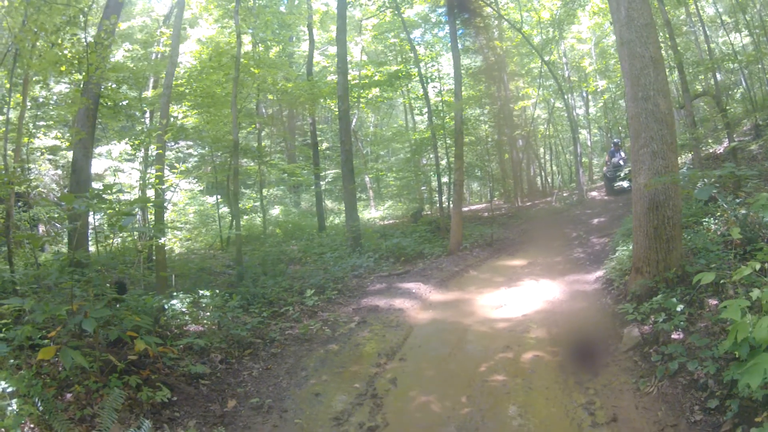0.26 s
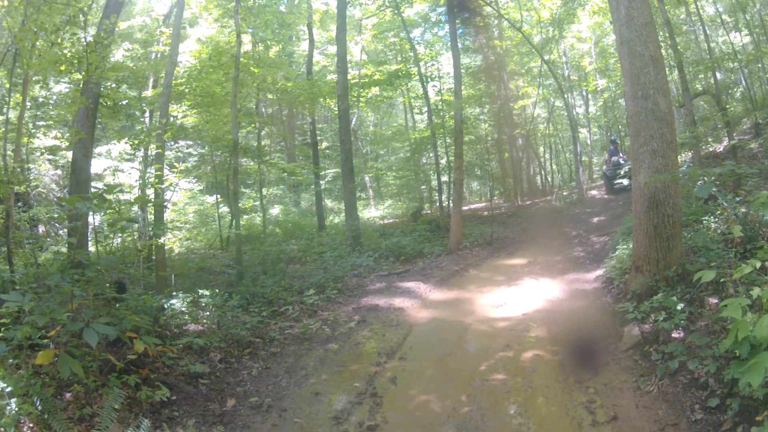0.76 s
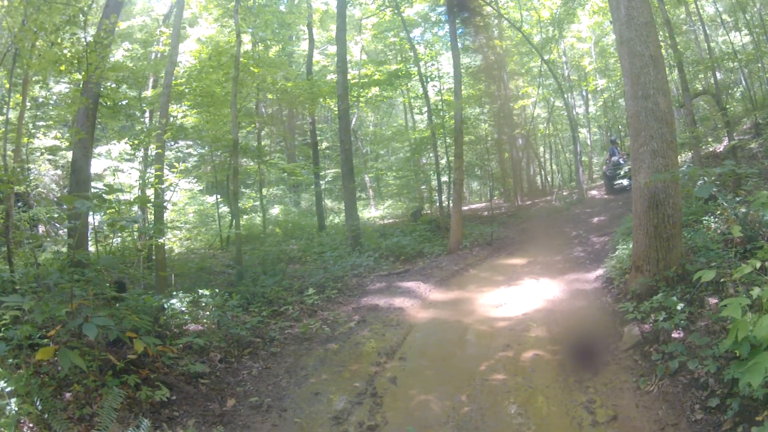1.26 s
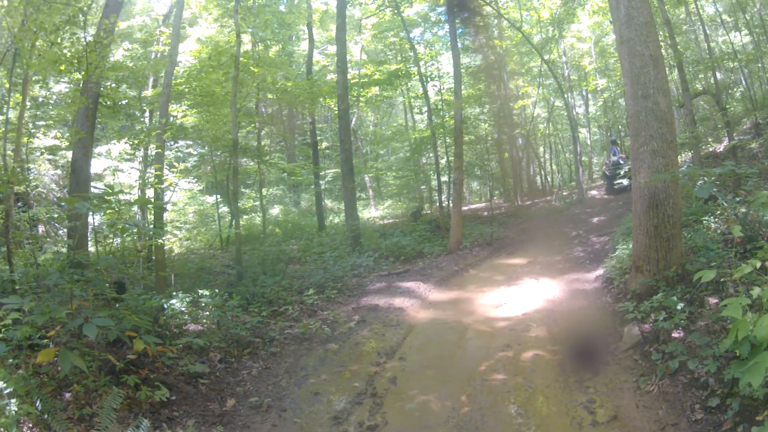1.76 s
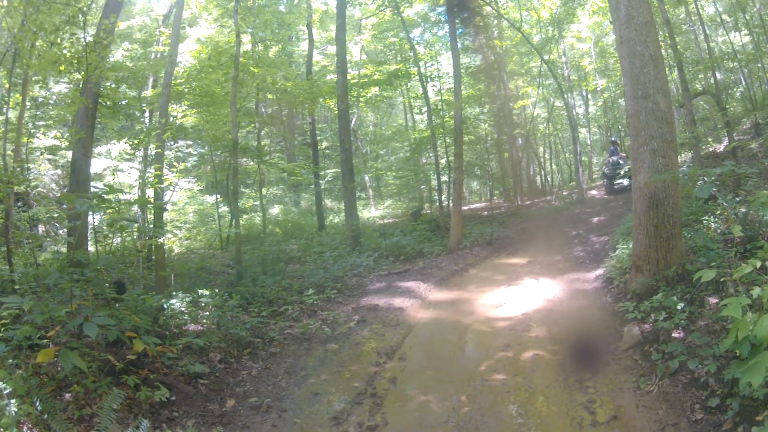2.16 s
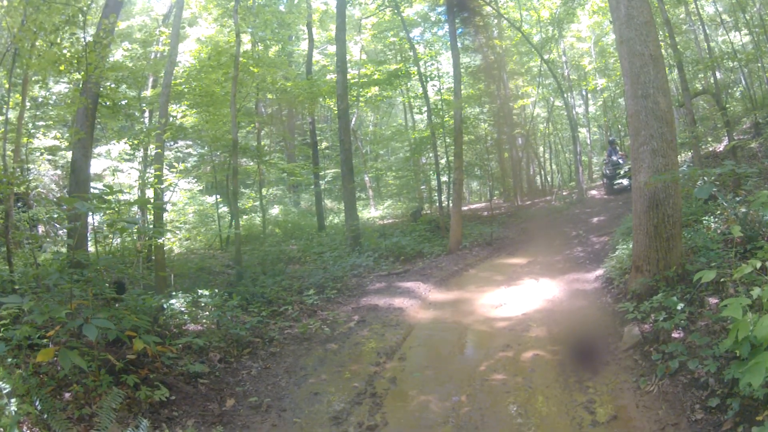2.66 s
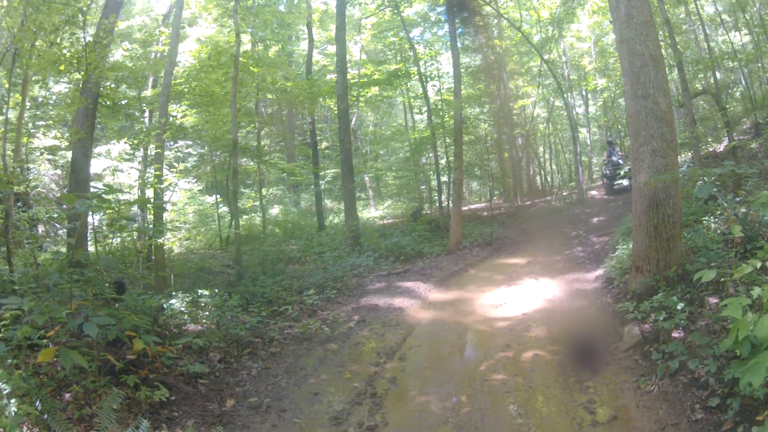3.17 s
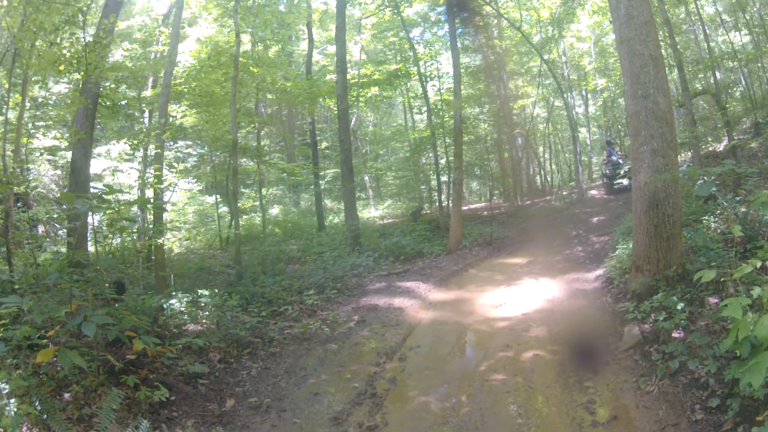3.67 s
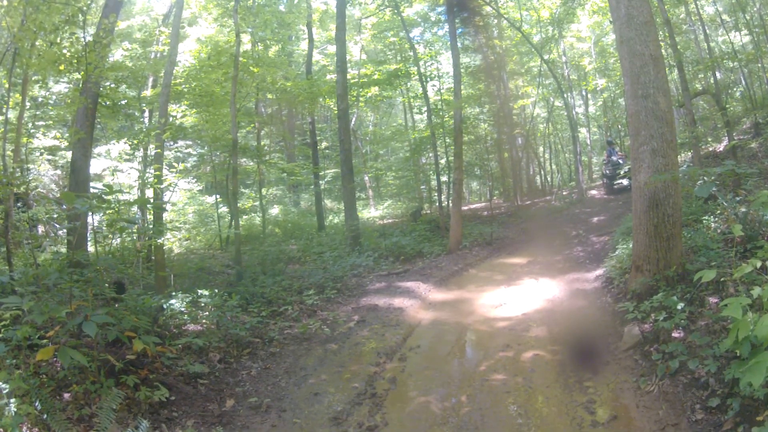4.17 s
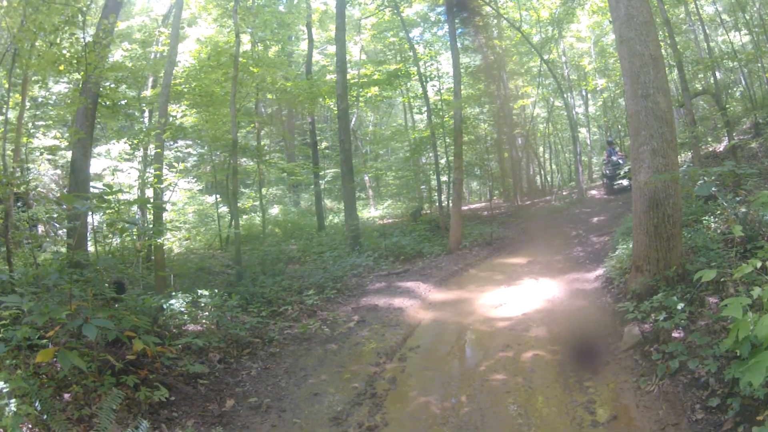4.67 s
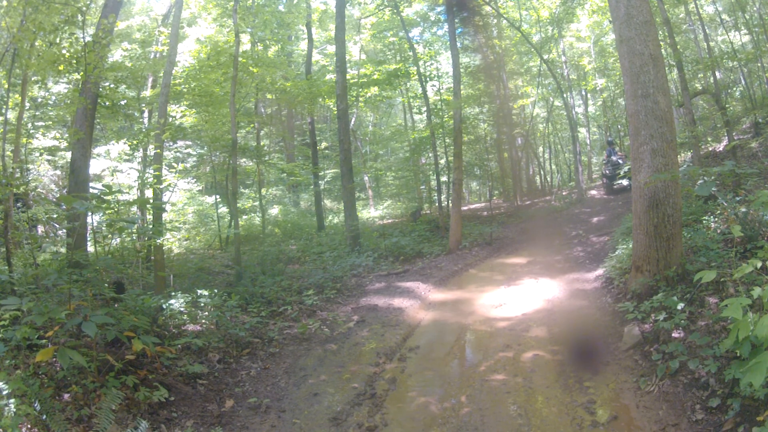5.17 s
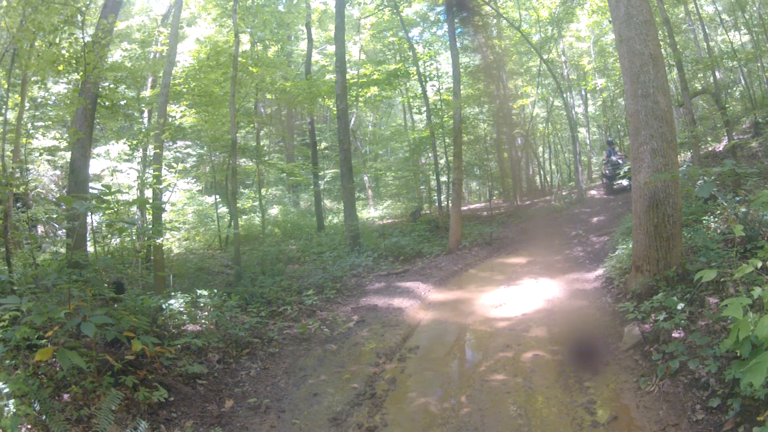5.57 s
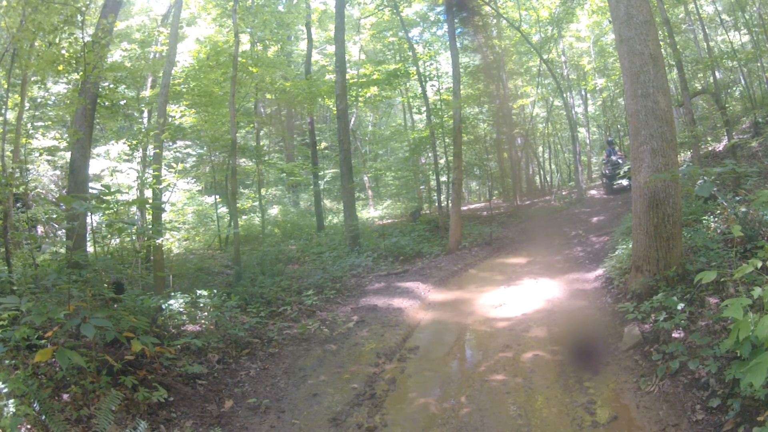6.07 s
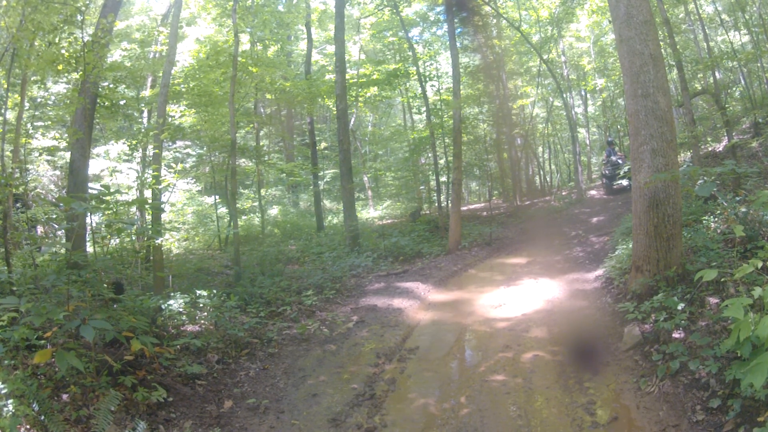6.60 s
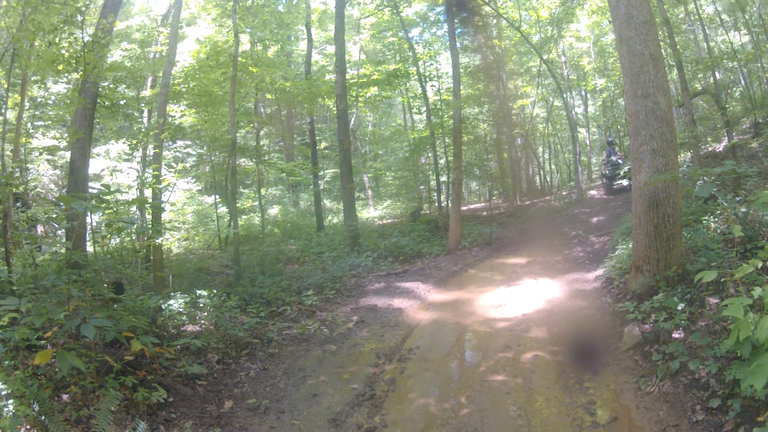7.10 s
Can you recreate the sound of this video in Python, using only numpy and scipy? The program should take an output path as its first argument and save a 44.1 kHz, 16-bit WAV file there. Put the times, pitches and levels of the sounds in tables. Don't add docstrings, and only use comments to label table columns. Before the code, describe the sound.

Close, gritty idle of a small four-stroke trail vehicle, steadily putting and clattering for six seconds before it jolts under load and speeds up.

```python
import sys
import numpy as np
from scipy import signal
from scipy.fft import rfft, irfft, next_fast_len
from scipy.io import wavfile
from scipy.ndimage import uniform_filter1d

SR = 44100
rng = np.random.default_rng(int(sys.argv[2]) if len(sys.argv) > 2 else 0)


def pcm_store(signal):
    levels = np.round(np.clip(np.atleast_2d(signal), -1, 1) * 32767)
    wavfile.write(sys.argv[1], SR, levels.astype(np.int16).T)


def volts_from_decibels(level):
    exponent = np.asarray(level, float) / 20
    return 10 ** exponent


N = 323694
TIME = np.arange(N) / SR
LOCK_S = 6.75


def level(x, db):
    return x * volts_from_decibels(db) / np.sqrt(np.mean(x ** 2))


def curves(table):
    s, *columns = np.transpose(table)
    return [np.interp(TIME, s, c) for c in columns]


def bumps(table):
    return sum(db * np.exp(-((TIME - s) / half_s) ** 2) for s, half_s, db in table)


def walk(rate):
    k = int(SR / rate)
    steps = np.repeat(rng.standard_normal(N // k + 1), k)
    return uniform_filter1d(uniform_filter1d(steps, k), k)[:N]


def ring(x, modes):
    size = next_fast_len(N + SR // 4)
    hz = np.fft.rfftfreq(size, 1 / SR) + 1e-6
    shape = 0
    for k, (mode_hz, width_hz, db) in enumerate(modes):
        detuning = (hz - mode_hz * mode_hz / hz) / width_hz
        shape = shape + (-1) ** k * volts_from_decibels(db) / (1 + 1j * detuning) ** 2
    return irfft(rfft(x, size) * shape, size)[:N]


def ping(x, hz, glide, half_s):
    t = np.arange(-400, 401) / SR
    burst = np.exp(-(t / half_s) ** 2) * np.sin(2 * np.pi * hz * t * (1 - glide * t))
    return signal.fftconvolve(x, burst, mode="same")


def smear(x, decay_s):
    return signal.lfilter([1], [1, -np.exp(-1 / (decay_s * SR))], x)


def blows(cycle, column, scatter_db, jitter_s):
    # cycle_share, frame_db, casing_db, tappet_cover_db, rattle_db
    taps = np.array([
        (0, -2, 0, 0, -7),
        (.09, -6, -15, -15, -7),
        (.2, 0, -16, -16, -4),
        (.345, -6, -14, -9, -6),
        (.45, -2, -6, -22, -2),
        (.55, -3, -14, -22, -9),
        (.65, -4, -10, -16, -16),
        (.73, -3, -18, -28, 0),
        (.865, 0, -14, -28, -5),
    ])
    when = np.arange(np.floor(cycle[0]), cycle[-1])[:, None] + taps[:, 0]
    chance = rng.standard_normal((2, *when.shape))
    at = np.interp(when, cycle, TIME) + jitter_s * chance[0]
    heard = (when > cycle[0]) * (when < cycle[-1])
    strength = volts_from_decibels(taps[:, column] + scatter_db * chance[1]) * heard
    out = np.zeros(N)
    np.add.at(out, np.clip(at * SR, 0, N - 1).astype(int), strength)
    return out


def extras(table, hz, half_s, trim_db):
    s, peak_db = np.transpose(table)
    out = np.zeros(N)
    out[((s + half_s) * SR).astype(int)] = volts_from_decibels(peak_db + trim_db)
    return ping(out, hz, 0, half_s)


def part(name, pulling):
    # idle_db, drift_db_per_s, pull_db, bite_db, wander_db
    rules = dict(frame=(-39, 0.68, 0, 3.5, 0.8), block=(-45, 0.38, 2, 3, 2),
             fins=(-46.5, -0.04, 7, 0, -1.1), tappet=(-39.5, -0.76, -2, -0.5, -1.1),
             low=(-53, -0.05, 2, 4.5, 3), high=(-49.5, -0.07, 0, 2.5, -0.5))
    idle_db, drift, pull_db, bite_db, wander_db = rules[name]
    bite = bumps([(6.49, .12, bite_db)])
    return volts_from_decibels(idle_db + drift * TIME + pull_db * pulling + bite + wander_db * walk(4.054))


def joints(x):
    # pitch_hz, width_hz, start_s, end_s, level_db
    loose_joints = [
        (174.3, 47, 1.3, 5.17, 5.5),
        (307, 43, 4.4, 6.4, 5.5),
        (270, 60, 6.9, 8.5, -12),
        (1310, 170, 6.9, 7.6, 6.5),
    ]
    out = x
    for hz, width_hz, start_s, end_s, db in loose_joints:
        loose = np.clip(np.minimum(TIME - start_s, end_s - TIME) / 0.17, 0, 1)
        out = out + (volts_from_decibels(db) - 1) * loose * ring(x, [(hz, width_hz, 0)])
    return out


def mount(hz, cycle, pulling):
    # order_of_cycle, idle_db, pull_db
    order_levels = [(2, -45, -32), (3, -29, -40), (4, -44, -32), (5, -38, -44), (6, -43, -44),
                    (7, -46, -44), (9, -47, -50), (10, -47, -48), (11, -49, -51), (15, -54, -56),
                    (19, -49, -50), (22, -50, -52)]
    leads = (-1.62, 2.0, 4.1, 5.6, 2.94)
    idle_lead, overtone_lead, low_lead, high_lead, pull_lead = leads
    # centre_s, level_db
    firings = [(.045, -5), (.252, -2.5), (.62, 2.6), (1.445, -5.5), (1.861, -1), (2.576, -1), (3.14, 2),
               (3.29, -5), (3.581, 2.5), (4.11, -3), (4.389, -5.1), (4.62, 0.3), (4.957, -4), (5.35, 2),
               (5.487, -6.1), (5.82, -1), (6.066, -4.6), (6.29, 1.7)]
    # centre_s, half_length_s, level_db
    bracket = [(.25, 0.095, -22), (.68, 0.08, 3), (.97, .05, -11), (3.55, .15, -4), (4.2, 0.26, -5.5),
               (4.55, 0.055, -5), (5.3, 0.2, 6), (5.57, .06, -22), (6.27, 0.16, -18), (6.62, 0.051, -15),
               (6.84, 0.057, 5), (6.96, 0.045, 1)]

    def order(k, lead):
        return np.sqrt(2) * np.cos(2 * np.pi * k * (cycle - .5) + lead)

    taken = np.clip((TIME - 6.41) / .035, 0, 1)
    locked = np.clip((TIME - LOCK_S) / .1, 0, 1)
    idle_drive = (1 - taken) * volts_from_decibels(-10) * order(4, idle_lead)
    pull_drive = taken * volts_from_decibels(-12 - 7.5 * locked) * order(3, pull_lead)
    firing_db = bumps([(s, .059, db) for s, db in firings])
    drive = (idle_drive + pull_drive) * volts_from_decibels(firing_db)
    mount_hz, mount_width_hz = 44.19, 2.61
    pole = np.exp((2j * np.pi * mount_hz - np.pi * mount_width_hz) / SR)
    boom = 2 * signal.lfilter([1 - abs(pole)], [1, -pole], drive).real

    overtone_db = -35 + 9 * pulling + bumps(bracket) + 3.5 * (1 - pulling) * walk(5)
    overtone = (1 - pulling) * order(8, overtone_lead) + pulling * order(6, overtone_lead)
    load = np.clip((hz - 12.5) / 4.5, 0, 1)
    rest = 0
    for k, idle_db, pull_db in order_levels:
        order_db = idle_db + load * (pull_db - idle_db) + (1 + k / 6) * walk(3)
        rest = rest + volts_from_decibels(order_db) * order(k, high_lead if k > 3 else low_lead)
    shaking = ring(rng.standard_normal(N), [(27.7, 18, -14), (52, 64, -5.5), (91, 164, -0.5)])
    jolt = volts_from_decibels(-27) * np.exp(-((TIME - 6.5) / .08) ** 2) * np.sin(2 * np.pi * 68 * TIME)
    return boom + volts_from_decibels(overtone_db) * overtone + rest + level(shaking, -39.5) + jolt


def frame(cycle, pulling):
    # pitch_hz, width_hz, level_db
    tube_modes = [(124.5, 25, -3.5), (173, 33, -27), (206.7, 41, -0.5), (260, 42, 1), (301.7, 36, 3.5),
                  (345.5, 45, -1), (398, 76, -3.5)]
    # centre_s, half_length_s, level_db
    snug = [
        (.6, 0.23, -3),
    ]
    thuds = blows(cycle, column=1, scatter_db=2.2, jitter_s=.0003)
    tubes = level(ring(level(thuds, 0) + .55 * rng.standard_normal(N), tube_modes), 0)
    return part("frame", pulling) * joints(tubes) * volts_from_decibels(bumps(snug))


def casing(cycle, pulling):
    # pitch_hz, width_hz, level_db
    block_modes = [(609, 65, -14.5), (751.5, 84, -7), (879, 95, -10), (945, 38, 0)]
    fin_modes = [(1168.6, 91, 4), (1301, 116, -5)]
    hits = blows(cycle, column=2, scatter_db=3.5, jitter_s=.0007) * volts_from_decibels(-8 * pulling)
    hum = (.5 + smear(hits, 0.0029)) * rng.standard_normal((2, N))
    knock = level(ping(hits, hz=935, glide=0, half_s=.0045), -1)
    block = level(knock + level(ring(hum[0], block_modes), 0), 0)
    fins = level(ring(level(hits, -14.0) + level(hum[1], 0), fin_modes), 0)
    return part("block", pulling) * block + part("fins", pulling) * joints(fins)


def tappet(cycle, pulling):
    # pitch_hz, width_hz, level_db
    cover_modes = [(2230, 130, -25), (2344, 66, 16), (2270, 70, -5)]
    # centre_s, half_length_s, level_db
    slack = [
        (.12, .35, -7),
        (1.24, .02, -8),
        (1.404, .02, -2),
        (2.09, .02, -8),
        (3.47, .02, -8),
        (4.402, .02, -4),
        (5.25, .25, -4),
        (6.44, .03, -16),
    ]
    seats = blows(cycle, column=3, scatter_db=.9, jitter_s=.0004) * volts_from_decibels(bumps(slack))
    seat_ping = level(ping(seats, hz=2350, glide=8, half_s=.0022), 0)
    pings = level(seat_ping + level(ring(seats, cover_modes), -9), 0)
    return part("tappet", pulling) * volts_from_decibels(-9.5 * pulling - 8.6 * np.exp(-TIME / 1.47)) * pings


def chatter(cycle):
    tight = np.clip((TIME - LOCK_S + 0.2) / 0.47, 0, 1)
    hits = blows(cycle, column=4, scatter_db=2.4, jitter_s=.0008)
    swing = (1 - tight) * smear(hits, .004) + tight * smear(hits, .0018)
    shake = .04 + np.tanh(2.3 * swing)
    size_db = np.minimum(4.0 * rng.exponential(size=N), 5)
    clicks = (rng.random(N) < 1500 / SR) * volts_from_decibels(size_db) * rng.choice([-1, 1], N)
    hiss = level(shake * rng.standard_normal(N), -1)
    return level(level(hits, -3) + level(shake * clicks, -3) + hiss, 0)


def rattle(loose, pulling):
    # pitch_hz, width_hz, level_db
    low_modes = [(3050, 106, 2.4), (3390, 290, 3.5), (3714, 187, 8.2)]
    high_modes = [(4355, 396, 2.5), (4930, 560, -6.5), (5560, 750, -8)]
    # centre_s, half_length_s, level_db
    lulls = [
        (.332, .006, -21),
        (.354, 0.0076, -21),
        (.592, 0.0041, -9),
        (.617, 0.0049, -13),
        (6.93, 0.14, -4),
        (6.97, .03, -6),
        (7.03, 0.015, -6),
        (7.28, 0.026, -3),
    ]
    low = part("low", pulling) * volts_from_decibels(2.0) * level(ring(loose, low_modes), 0)
    high = part("high", pulling) * volts_from_decibels(3.0 + bumps(lulls)) * level(ring(loose, high_modes), 0)
    return low + high


def fan_air(loose, pulling):
    # pitch_hz, width_hz, level_db
    shroud_modes = [(1774, 465, -9.5), (1844, 89, 1), (1996, 95, 1.5), (2241, 204, 1), (2723, 450, -8.5)]
    rush = ring(loose + 0.5 * rng.standard_normal(N), shroud_modes)
    return volts_from_decibels(2.0 * pulling) * level(rush, -48.5)


def block_knocks():
    # start_s, peak_db
    knocks = [(1.055, -28), (1.141, -23.5), (1.57, -22), (1.999, -30), (3.973, -30), (4.48, -27),
              (6.351, -23.5), (6.434, -26.5), (6.535, -28), (6.574, -27), (6.707, -26), (7.069, -28)]
    return extras(knocks, hz=927, half_s=0.00499, trim_db=-3)


def load_blips():
    # start_s, peak_db, pitch_hz
    blips = [(6.165, -34, 2300), (6.2, -33, 720), (6.385, -31, 1980), (6.46, -24, 1200),
             (6.5142, -32, 3520), (6.5676, -43, 3300), (6.6469, -34, 3750), (6.6883, -47, 3520),
             (6.7761, -39, 3470), (6.811, -40, 3050), (6.8394, -34, 3700), (6.921, -38, 3900),
             (6.9617, -49, 3700), (6.981, -36, 3700), (7.0415, -32.5, 3700), (7.1, -35, 3450),
             (7.2176, -33, 3440), (7.256, -39, 3830)]
    return sum(extras([(s, db)], hz=hz, half_s=.003, trim_db=-2) for s, db, hz in blips)


def scene():
    # start_s, four_stroke_cycles_hz
    speed = [(0.0, 12.615), (0.32, 11.671), (0.913, 11.48), (1.104, 11.211), (1.339, 11.861),
             (2.165, 11.463), (2.423, 11.743), (2.893, 11.569), (3.733, 11.709), (4.065, 11.975),
             (4.419, 11.754), (5.41, 11.712), (5.943, 12.053), (6.306, 11.179), (6.461, 13.112),
             (6.716, 15.367), (7.0, 16.553), (7.34, 17.235)]
    hz, = curves(speed)
    cycle = np.cumsum(hz) / SR
    cycle -= cycle[int(.5365 * SR)]
    pulling = np.clip((TIME - 6.46) / 0.035, 0, 1)
    boom = joints(mount(hz, cycle, pulling))
    engine = frame(cycle, pulling) + casing(cycle, pulling) + block_knocks()
    engine = engine * volts_from_decibels(3.7 * np.exp(-TIME / 0.17))
    valves = tappet(cycle, pulling)
    loose = chatter(cycle)
    mix = boom + engine + valves + rattle(loose, pulling) + fan_air(loose, pulling) + load_blips()
    return mix[None]


def thin(x, under_db):
    hz, _, frames = signal.stft(x, SR, nperseg=1024)
    power = uniform_filter1d(np.abs(frames) ** 2, size=5, axis=1)
    usual = np.median(power[:, (hz > 7000) & (hz < 9000)])
    keep = (power > usual * volts_from_decibels(2 * under_db)) | (hz < 5000)[:, None]
    return signal.istft(frames * keep, SR, nperseg=1024)[1][:, :N]


def roll_off(x):
    return signal.sosfilt(signal.butter(12, 15360, fs=SR, output="sos"), x)


def record(dry):
    sample_hz, hold = 12000, 4
    cut = signal.sosfilt(signal.ellip(8, .1, 60, 5780, fs=SR, output="sos"), dry)
    coarse = signal.resample_poly(cut, sample_hz // 300, SR // 300, axis=1, window=("kaiser", 2.0))
    held = np.repeat(coarse, hold, axis=1)
    fine = signal.resample_poly(held, SR // 300, sample_hz * hold // 300, axis=1)[:, :N]
    fine = signal.sosfilt(signal.ellip(8, .2, 45, 14620, fs=SR, output="sos"), fine)
    return roll_off(thin(fine, under_db=-12.0))


dry = scene()
out = record(dry)
pcm_store(out)
```